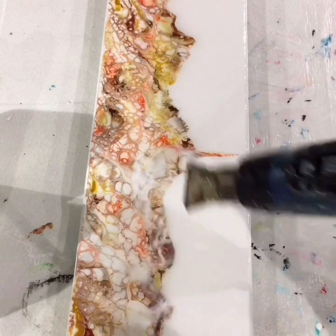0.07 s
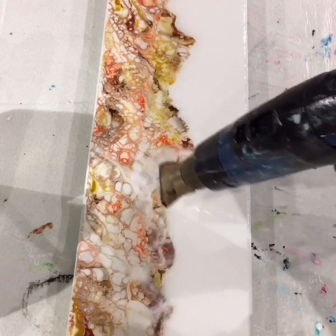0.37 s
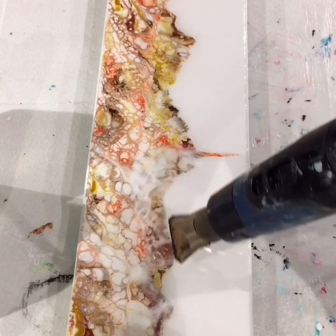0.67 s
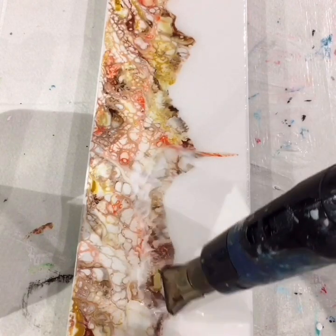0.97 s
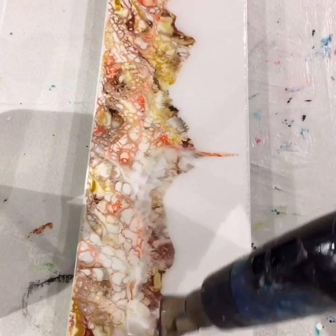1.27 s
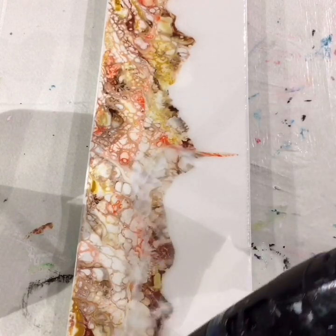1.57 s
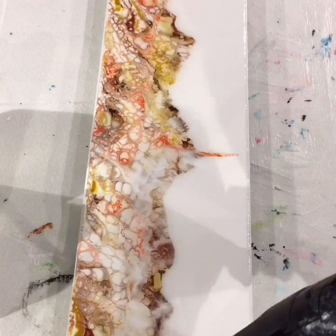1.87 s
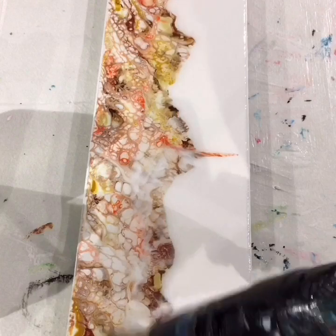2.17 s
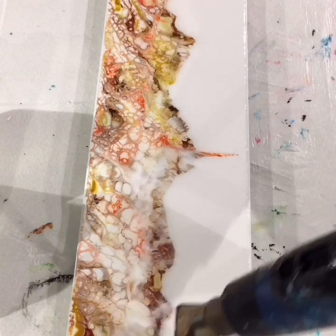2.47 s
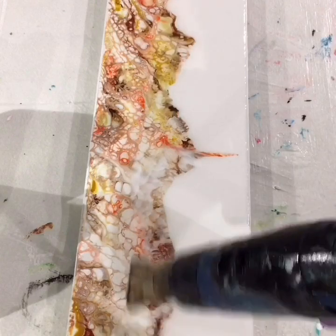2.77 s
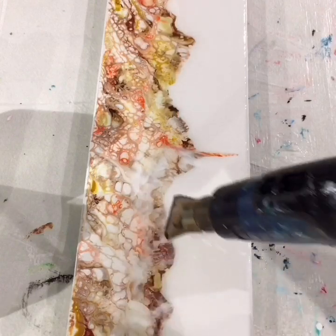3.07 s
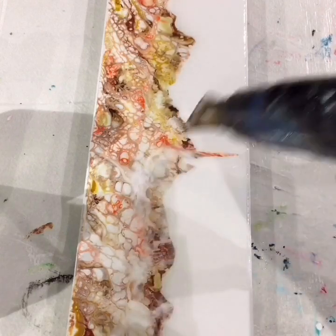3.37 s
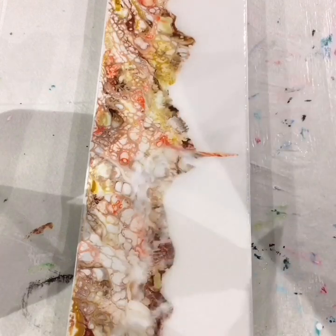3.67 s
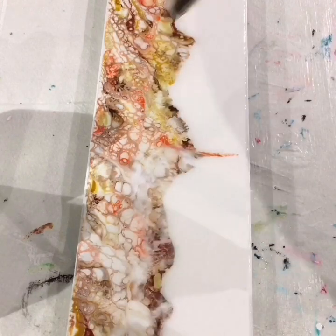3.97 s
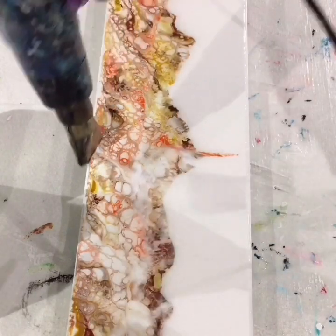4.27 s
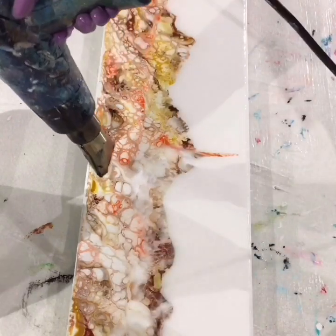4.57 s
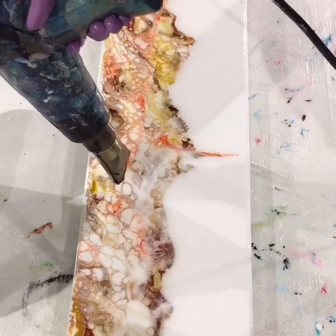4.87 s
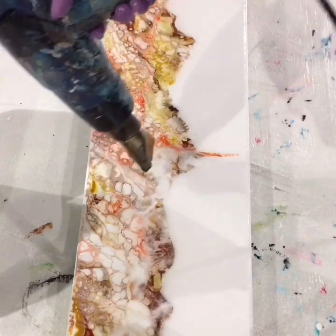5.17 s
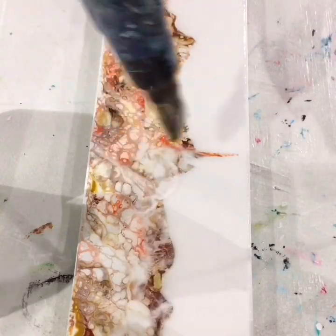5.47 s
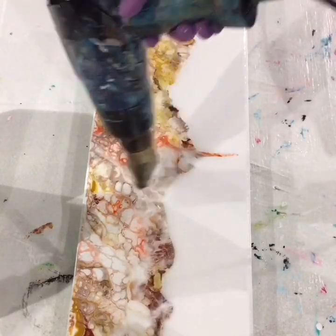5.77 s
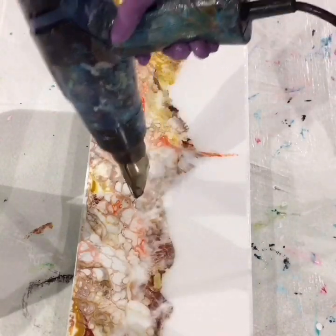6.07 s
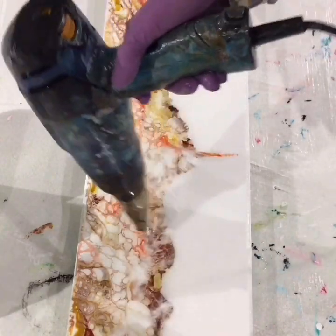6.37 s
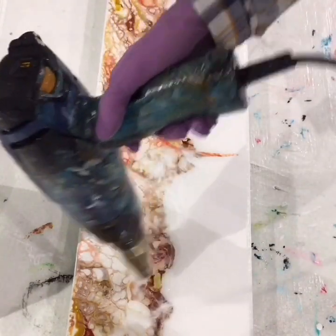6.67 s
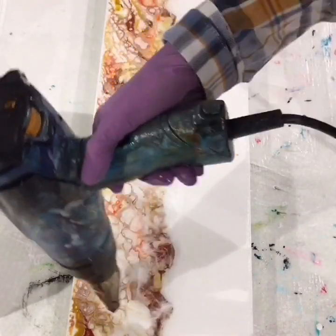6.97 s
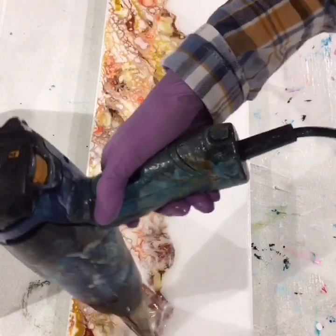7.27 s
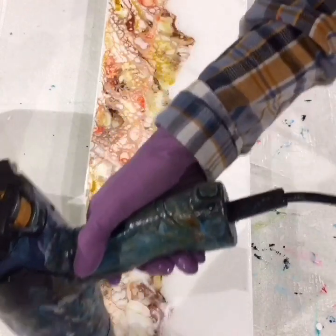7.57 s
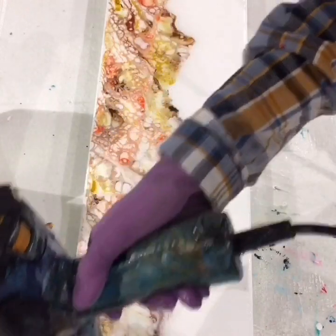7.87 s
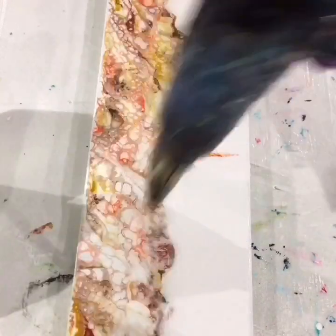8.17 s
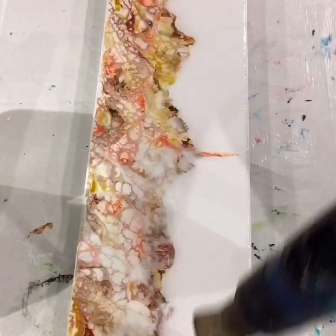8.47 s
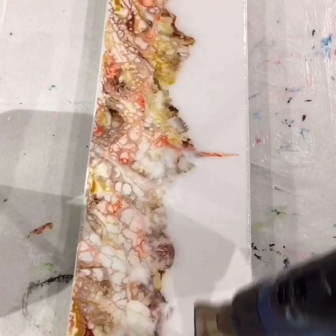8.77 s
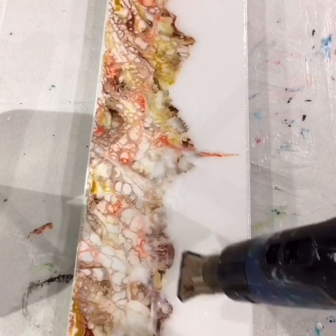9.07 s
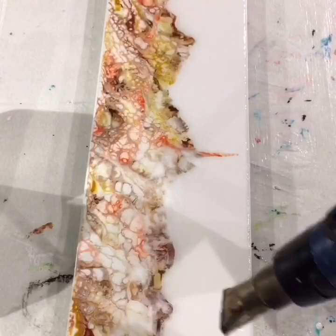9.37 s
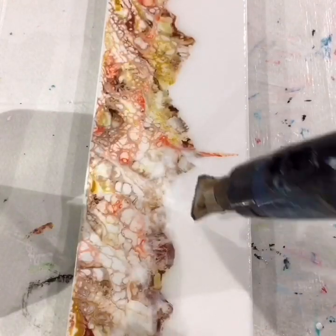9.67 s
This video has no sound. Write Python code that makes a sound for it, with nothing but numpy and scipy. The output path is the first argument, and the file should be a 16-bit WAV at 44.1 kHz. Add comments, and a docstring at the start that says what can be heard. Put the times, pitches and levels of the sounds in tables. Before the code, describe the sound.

A heat gun runs on high the whole time, close to the microphone, sweeping over wet resin on a table. Air roars and hisses through the nozzle over a steady motor hum, whine and fine buzz. Soft swooshes mark its swings. About a third of the way in, it rustles briefly and its plastic housing ticks. Near the end come quick swings and a few sharper ticks, and it keeps blowing.

```python
"""A heat gun on high, swept to and fro over wet resin on a table, close to the microphone.
From the start air roars through barrel and nozzle, mirrored by the table top, while the fan motor hums,
whines and buzzes at about 279 turns a second. Swings swoosh, and from about 1 s stray air now and then
brushes the microphone. Near 3.7 s the gun is turned round: it rustles and its housing ticks. A run of
quick swings comes around 8 s, with more ticks near 8.4 s, and the gun blows on to the end."""
import sys
import numpy as np
from scipy import signal
from scipy.fft import rfft, irfft, next_fast_len
from scipy.io import wavfile
from scipy.ndimage import uniform_filter1d, map_coordinates

SR = 44100
rng = np.random.default_rng(int(sys.argv[2]) if len(sys.argv) > 2 else 0)


def dump(signal):
    """Clip the signal to [-1, 1] and save it as 16-bit WAV at the path in sys.argv[1]."""
    limited = np.clip(np.atleast_2d(signal).T, -1, 1)
    pcm = np.round(limited * 32767).astype(np.int16)
    wavfile.write(sys.argv[1], SR, pcm)


N = 432180

# Spectra of the moving air and the handling: pitch_hz, relative_db
RUMBLE_COLOUR = [(20, -32), (32, -23), (42, -9), (50, -5), (59, 3.5), (68, -10), (77, 0.5), (92, -11),
                 (130, -3.5), (185, 0), (380, -2.5), (520, -2), (700, -12.5), (1500, -63)]
WASH_COLOUR = [(300, -15.5), (420, -9.5), (530, -10), (620, 0), (715, 2), (775, -5), (900, -33)]  # air washing over the resin
LOW_ROAR_COLOUR = [(650, -12), (770, -5.5), (850, 1.5), (945, 4.5), (1005, -0.5), (1100, 7), (1180, 3.5),
                   (1260, 3), (1400, -29)]  # barrel
HIGH_ROAR_COLOUR = [(1130, -22), (1280, 2), (1370, 7), (1450, 5.5), (1560, 2.5), (1650, 4.5), (1740, -2),
                    (2100, -2.5)]
RUSH_COLOUR = [(1800, -6), (2700, -1.5), (3100, -2), (3350, 0), (3650, 0), (4000, -6.5), (4500, -29.5),
               (6000, -43)]  # nozzle
SPLASH_COLOUR = [(3000, 6), (3900, 1), (4300, 7), (4900, 0), (5350, -8), (5800, -9), (7500, -40)]  # jet striking the table
JET_HISS_COLOUR = [(4500, -28), (5300, 0.5), (5750, -1.5), (6150, 1.5), (6550, 0), (7050, 1.5), (7600, -3),
                   (8500, -0.5), (10400, -6.5), (11100, -2.5), (12000, -17.5), (13200, -9), (15700, -20)]
VENT_HISS_COLOUR = [(8000, -5), (10500, -4.5), (11200, 1), (13300, 3.5), (15700, 3)]
RUSTLE_COLOUR = [(60, -14), (200, 1), (500, 9), (2000, 13), (4000, 10), (7000, 5), (12000, 6), (16000, 5)]
GUST_COLOUR = [(32, -18), (42, 0), (60, -2), (85, 7), (160, -12)]

# Air layers at the microphone, before their trims: time_s, level_db
RUMBLE_LEVEL = [(0, -52), (1.7, -50.5), (3.3, -53), (4.3, -52.5), (5.3, -51), (7.2, -49), (8.6, -53.5),
                (9.8, -51.5)]
WASH_LEVEL = [(0.0, -48), (1.28, -49.5), (1.58, -46), (5.64, -51), (6.42, -50.5), (8.1, -51.5), (8.36, -43),
              (9.8, -48)]
LOW_ROAR_LEVEL = [(0.0, -38.5), (1.38, -38.5), (1.48, -40), (2.94, -40.5), (3.22, -37), (3.62, -42.5),
                  (4.0, -39.2), (4.08, -42), (5.66, -39.2), (7.18, -39), (7.76, -40.5), (7.92, -38),
                  (8.78, -40), (9.02, -35.5), (9.44, -41.4), (9.8, -37)]
HIGH_ROAR_LEVEL = [(0.0, -38), (0.26, -42.0), (0.6, -37.5), (1.44, -36.5), (1.92, -40.5), (3.78, -38),
                   (4.3, -43.5), (5.14, -37.5), (5.6, -43.2), (5.8, -38.5), (7.44, -36.1), (8.22, -40.2),
                   (8.38, -35.6), (8.62, -40.5), (8.76, -36.5), (9.14, -35), (9.32, -41.5), (9.8, -39.5)]
RUSH_LEVEL = [(0.0, -43.5), (0.14, -38.5), (0.36, -41.5), (1.6, -40), (3.12, -41.5), (3.92, -46),
              (4.06, -42.5), (4.5, -46), (4.96, -37), (5.2, -41.5), (7.62, -41), (8.0, -42.8), (8.08, -40),
              (9.18, -41.5), (9.52, -40.5), (9.8, -42)]
SPLASH_LEVEL = [(0.0, -49), (0.84, -56), (0.92, -48.5), (2.5, -46.9), (3.88, -54.5), (4.36, -50),
                (4.64, -60.3), (4.76, -54.4), (5.24, -58), (5.62, -50), (6.0, -56.5), (7.32, -48.8),
                (8.58, -49), (9.8, -51)]
JET_HISS_LEVEL = [(0.0, -46.0), (2.4, -46.5), (3.8, -46.5), (4.2, -45.5), (4.4, -48.5), (4.6, -45.5),
                  (5.0, -47), (5.4, -44.5), (5.6, -46), (6.6, -44.7), (8.0, -46.5), (8.2, -44), (9.0, -47),
                  (9.8, -44)]
INTAKE_LEVEL = [(0.0, -43.3), (0.92, -37.5), (2.04, -38), (2.32, -31), (2.4, -43.5), (2.74, -34.5),
                (3.4, -41.5), (4.22, -37.5), (4.48, -41.5), (4.64, -38.5), (5.38, -37.6), (5.54, -43),
                (5.8, -34), (6.54, -38), (7.18, -35), (9.5, -40.5), (9.62, -48), (9.8, -41)]
# Fan intake resonances: pitch_hz, width_hz, relative_db
INTAKE_MODES = [(2268, 158, 7.5), (2420, 294, 6.5), (2640, 170, 2.5)]
# Swooshes as the gun swings: start_s, length_s, from_hz, to_hz, half_width_hz, peak_db
SWINGS = [(.35, 0.97, 3900, 3900, 250, -44.5), (1.501, .85, 4910, 5400, 500, -52),
          (2.24, .28, 2460, 1913, 260, -39.5), (2.744, 0.28, 2350, 1893, 260, -38),
          (2.95, 0.12, 2700, 2550, 180, -41), (4.02, 0.15, 2900, 2650, 170, -39.5),
          (4.097, .16, 2217, 1990, 300, -36), (4.219, 0.16, 2385, 2830, 300, -39),
          (5.537, 0.16, 2980, 4280, 450, -56), (7.05, 0.636, 2330, 2378, 149, -33),
          (7.901, 0.22, 2500, 2710, 300, -45), (8.079, 0.119, 2500, 2320, 190, -32.5),
          (8.138, .11, 3000, 2710, 280, -35.5), (8.259, .14, 2450, 2595, 160, -36.5),
          (8.481, 0.23, 2515, 2730, 230, -35), (9.35, 0.37, 2920, 3750, 300, -42)]
# Lag of the table top's reflection, set by the gun's height: time_s, lag_ms
TABLE_LAG = [(0.0, 1.14), (0.75, 0.8), (1.16, 0.78), (2.86, 0.94), (3.08, 1.08), (3.74, 0.5), (3.87, 0.42),
             (4.0, 1.1), (4.54, 0.88), (4.63, 0.82), (5.06, 0.8), (5.55, 0.62), (6.05, 0.82), (7.1, 0.86),
             (7.18, 0.52), (8.28, 0.4), (9.56, 1.12), (9.8, 0.96)]

# Motor speed, sagging a little in quick swings: time_s, shaft_hz
SHAFT_SPEED = [(0.0, 279.1), (0.12, 278.7), (1.28, 279.2), (1.48, 278.3), (2.34, 279.3), (2.46, 278.7),
               (3.68, 279.2), (4.22, 277.0), (4.98, 279.3), (5.36, 279.7), (7.82, 279.7), (8.52, 277.8),
               (8.84, 278.8), (9.42, 279.6), (9.54, 277.4), (9.62, 279.1), (9.7, 278.3), (9.8, 278.9)]
# Motor sounds that depend on how the gun points: time_s, level_db
HUM_LEVEL = [(0.0, -54), (0.94, -51.5), (2.24, -58.5), (3.76, -49.5), (3.84, -56.1), (4.0, -44.5),
             (8.26, -49.5), (8.72, -55.0), (8.8, -67), (9.04, -54), (9.8, -53)]  # strongest with the motor facing the microphone
WHISTLE_LEVEL = [(0, -54), (1.3, -76), (1.95, -50.5), (2.4, -70), (5.0, -65), (5.4, -53.5), (6.5, -59),
                 (8.1, -55), (8.7, -57), (9.8, -60)]  # clearest with the back of the gun near
TREBLE_LEVEL = [(0.0, -45.5), (0.52, -43.7), (1.02, -47), (1.28, -42), (2.1, -47), (2.46, -43),
                (2.9, -45.5), (3.26, -42.5), (3.4, -44.5), (4.34, -47.5), (7.44, -41), (7.88, -43.5),
                (8.14, -40.5), (8.6, -45), (9.32, -44), (9.8, -43.5)]  # beams out of the vents; only its rise and fall is used
# Two bright high motor tones that stand out and glint: shaft_multiple, mean_db
SHRILL_TONES = [(40, -58.5), (47, -59)]
# Other clear shaft tones, before their trim: shaft_multiple, level_db
CLEAR_TONES = [(3, -56.5), (4, -58), (6, -59), (7, -68), (9, -56), (12, -62), (16, -66.5), (22, -66),
               (23, -74), (25, -62), (33, -64), (34, -65), (37, -64.5), (39, -67), (50, -60), (53, -67),
               (55, -72)]
# Even comb of commutator buzz between them, before the same trim: pitch_hz, line_db
BUZZ_COLOUR = [(2800, -55.5), (4000, -86), (5500, -62), (8000, -74), (10000, -67), (12000, -62.5),
               (14000, -70), (15700, -64)]

# Scrapes as the gun is turned round: peak_s, peak_db
SCRAPES = [(3.695, -34), (3.735, -33), (3.767, -35), (3.842, -46)]
# Ticks of the plastic housing: start_s, ring_db, pitch_hz, ring_t60_s, crack_relative_db
TICKS = [(3.7004, -23, 3800, 0.0095, -2), (3.7265, -33, 2800, 0.0056, -2), (3.7402, -27, 7000, .004, 8),
         (3.763, -25, 6100, 0.0056, -2), (3.841, -27, 4280, 0.0055, 5), (8.3937, -15.5, 8610, 0.0039, 0),
         (8.406, -26, 6300, .005, 5), (8.473, -10.5, 6150, 0.0035, -5), (8.5922, -24, 5570, 0.0049, 7.5)]
# Stray air at the microphone: peak_s, length_s, peak_db
GUSTS = [(1.2, .3, -68), (1.7, .7, -59), (2.7, 0.59, -63), (3.72, 0.23, -63), (5.4, .2, -70),
         (5.9, 0.27, -63), (8.3, 0.23, -59)]

DRONE_ORDER, WHINE_ORDER, WHISTLE_ORDER = 5, 8, 20  # shaft multiples; the whine is the fan blades'
TOP_HZ = 15700


def airflow(flicker_db=0.61, low_trim_db=-0.02, high_trim_db=-0.17, rush_trim_db=1.47,
            splash_trim_db=2.1, hiss_trim_db=0.77):
    """Turbulence in intake, barrel and nozzle, and where the jet meets the table."""
    rumble = tint(noise(), RUMBLE_COLOUR) * undb(curve(RUMBLE_LEVEL))
    wash = tint(noise(), WASH_COLOUR) * undb(curve(WASH_LEVEL))
    roar = tint(noise(), LOW_ROAR_COLOUR) * undb(curve(LOW_ROAR_LEVEL) + low_trim_db)
    roar += tint(noise(), HIGH_ROAR_COLOUR) * undb(curve(HIGH_ROAR_LEVEL) + high_trim_db)
    roar = shimmer(roar, depth_db=1.65, rate_hz=6.7, patch_hz=118) * undb(flicker_db * walk(18))
    rush = shimmer(tint(noise(), RUSH_COLOUR), depth_db=2.0, rate_hz=5.5, patch_hz=232)
    rush *= undb(curve(RUSH_LEVEL) + rush_trim_db + flicker_db * walk(20))
    splash = tint(noise(), SPLASH_COLOUR) * undb(curve(SPLASH_LEVEL) + splash_trim_db)
    hiss = shimmer(tint(noise(), JET_HISS_COLOUR), depth_db=1.9, rate_hz=7.0, patch_hz=495)
    hiss *= undb(curve(JET_HISS_LEVEL) + hiss_trim_db + walk(14))
    return rumble + wash + roar + swings(intake()) + rush + splash + hiss


def intake(waver_db=0.7, trim_db=0.1):
    """Intake resonances trade strength as the gun tilts: with the hum, the top gains, the lowest loses."""
    tilt_db = 0.14 * swell(HUM_LEVEL)
    ring = np.zeros(N)
    for lean, (hz, width_hz, db) in zip(np.linspace(-1, 1, len(INTAKE_MODES)), INTAKE_MODES):
        ring += undb(db + lean * tilt_db + waver_db * walk(3.95)) * resonate(noise(), hz, width_hz)
    return unit(ring) * undb(curve(INTAKE_LEVEL) + trim_db)


def swings(ring, duck_share=0.81, reach_hz=800):
    """Each swing adds a swoosh; the intake ring gives up power to it when they are near in pitch."""
    ring, swoosh = ring.copy(), np.zeros(N)
    ring_hz = np.mean(INTAKE_MODES, axis=0)[0]
    for start_s, length_s, from_hz, to_hz, half_width_hz, peak_db in SWINGS:
        progress = np.linspace(0, 1, int(length_s * SR))
        span = slice(int(start_s * SR), int(start_s * SR) + len(progress))
        arch = np.sin(np.pi * progress)
        hz = from_hz + (to_hz - from_hz) * progress
        nearness = np.exp(-((hz - ring_hz) / reach_hz) ** 2)
        ring[span] *= np.sqrt(1 - duck_share * arch * nearness)
        swoosh[span] += undb(peak_db) * arch * glide(hz, half_width_hz)
    return ring + swoosh


def motor(flutter=0.00022, waver_db=1.05, glint_db=3.0, glint_hz=9.8, fade_hz=3.0, trim_db=2.3):
    """Shaft harmonics; all but the leading ones fade and turn in phase as the gun moves."""
    shaft_hz = curve(SHAFT_SPEED)
    phase = 2 * np.pi * np.cumsum(shaft_hz * (1 + flutter * walk(30))) / SR
    hum_swell_db = swell(HUM_LEVEL)
    beam_db = 0.95 * swell(TREBLE_LEVEL)
    leading_db = {1: curve(HUM_LEVEL) + waver_db * walk(7),
                  2: -61.5 + 0.67 * hum_swell_db,
                  DRONE_ORDER: -47 + 0.72 * swell(HIGH_ROAR_LEVEL) + 0.35 * hum_swell_db,
                  WHINE_ORDER: -45 + 1.46 * swell(INTAKE_LEVEL),
                  WHISTLE_ORDER: curve(WHISTLE_LEVEL) + waver_db * walk(7)}
    for order, db in SHRILL_TONES:  # short wavelengths glint with every tremor of the hand
        leading_db[order] = db + beam_db + glint_db * walk(glint_hz)
    clear_db, beam = dict(CLEAR_TONES), undb(beam_db)
    tones = np.zeros(N)
    for order in range(1, int(TOP_HZ / shaft_hz.mean()) + 1):
        angle = order * phase + 2 * np.pi * rng.random()
        if order in leading_db:
            tones += undb(leading_db[order]) * np.sin(angle)
            continue
        line_hz = order * shaft_hz.mean()
        line_db = clear_db.get(order, colour_at(BUZZ_COLOUR, line_hz)) + trim_db
        direct = np.sin(angle)
        reflected = walk(fade_hz) * direct + walk(fade_hz) * np.cos(angle)
        line = (direct + reflected) * undb(line_db) / np.sqrt(3)
        tones += line * beam if line_hz > 8000 else line
    return np.sqrt(2) * tones


def vents(mean_db=-51.5, flicker_db=0.7):
    """Fine hiss leaves the motor vents with the buzz, rising as they turn to the microphone."""
    level_db = mean_db + 1.2 * swell(TREBLE_LEVEL) + flicker_db * walk(9.2)
    hiss = shimmer(tint(noise(), VENT_HISS_COLOUR), depth_db=5.5, rate_hz=3.8, patch_hz=391)
    return hiss * undb(level_db)


def table_top(air, reflection_gain=0.1):
    """The reflection combs the air noise, and the comb slides with the gun's height."""
    dulled = uniform_filter1d(air, size=4)  # the uneven resin scatters the treble
    delayed_index = np.arange(N) - curve(TABLE_LAG) * SR / 1000
    return air + reflection_gain * map_coordinates(dulled, [delayed_index], order=3)


def housing_ticks(crack_t60_s=0.016):
    """Each tick of the plastic is a short bright crack and one quickly damped ring."""
    ticks, t = np.zeros(N), np.arange(SR // 20) / SR
    highpass = signal.butter(2, 4000, "high", fs=SR)
    for start_s, ring_db, pitch_hz, ring_t60_s, crack_db in TICKS:
        ring = np.sin(2 * np.pi * pitch_hz * t) * undb(-60 * t / ring_t60_s)
        crack = signal.lfilter(*highpass, rng.standard_normal(len(t))) * undb(-60 * t / crack_t60_s)
        start = int(start_s * SR)
        ticks[start:start + len(t)] += undb(ring_db) * (ring + undb(crack_db) * crack / 2)
    return ticks


def rustle(attack_s=0.029, release_s=0.035, grain_db=3.5, grains_per_s=600):
    """Dense uneven scrapes while the gun is turned round; each swells and dies away."""
    t, power = np.arange(N) / SR, np.zeros(N)
    for peak_s, peak_db in SCRAPES:
        falloff = np.maximum((peak_s - t) / attack_s, (t - peak_s) / release_s).clip(0, 20)
        power += (undb(peak_db) * np.exp(-falloff)) ** 2
    grain_index = (np.arange(N) * grains_per_s / SR).astype(int)
    grain_gain = undb(grain_db * np.sqrt(3) * rng.uniform(-1, 1, N))
    return tint(noise() * grain_gain[grain_index], RUSTLE_COLOUR) * np.sqrt(power)


def gusts():
    """Soft low buffets as stray air from the jet reaches the microphone."""
    t = np.arange(N) / SR
    envelope = sum(undb(db) * np.exp(-(2 * (t - peak_s) / length_s) ** 2)
                   for peak_s, length_s, db in GUSTS)
    return tint(noise(), GUST_COLOUR) * envelope


def shimmer(x, depth_db, rate_hz, patch_hz):
    """Patches of the spectrum rise and sink as the nozzle turns."""
    hz, time_s, frames = signal.stft(x, SR, nperseg=512)
    patches = rng.standard_normal((64, 128))
    grid = np.meshgrid(hz / patch_hz, time_s * rate_hz, indexing="ij")
    gain_db = depth_db * map_coordinates(patches, grid, mode="wrap")
    return signal.istft(frames * undb(gain_db), SR)[1][:N]


def glide(hz, half_width_hz):
    """A band of noise whose centre follows `hz`."""
    real, imaginary = rng.standard_normal((2, 2 * SR))[:, :len(hz)]
    envelope = signal.lfilter(*signal.butter(2, half_width_hz, fs=SR), real + 1j * imaginary)
    carrier = np.exp(2j * np.pi * np.cumsum(hz) / SR)
    return unit(np.real(envelope * carrier))


def resonate(x, hz, width_hz):
    """A resonance, applied twice for steep skirts."""
    b, a = signal.iirpeak(hz, hz / width_hz, fs=SR)
    return signal.lfilter(b, a, signal.lfilter(b, a, x))


def tint(x, colour):
    """Give a sound a spectrum, at rms 1."""
    size = next_fast_len(N, True)
    gain = undb(colour_at(colour, np.fft.rfftfreq(size, 1 / SR)))
    return unit(irfft(rfft(x, size) * gain, size)[:N])


def colour_at(colour, hz):
    """Read a spectrum in dB on a log-frequency axis; it falls 60 dB an octave beyond its ends."""
    points_hz, db = np.transpose(colour)
    octave, known = np.log2(np.maximum(hz, 1)), np.log2(points_hz)
    octaves_outside = np.abs(octave - np.clip(octave, known[0], known[-1]))
    return np.interp(octave, known, db) - 60 * octaves_outside


def walk(rate_hz):
    """Smooth random drift with a spread near 1, changing about `rate_hz` times a second."""
    values = rng.standard_normal(1024)
    position = np.linspace(0, N / SR, 2048) * rate_hz + 10 * rng.random()
    drift = map_coordinates(values, [position], order=3, mode="wrap")
    return np.interp(np.arange(N), np.linspace(0, N, len(drift)), drift)


def curve(table):
    """Rows of (time_s, value), joined by straight lines."""
    return np.interp(np.arange(N) / SR, *np.transpose(table))


def swell(table):
    """How far a level stands above its own mean, in dB."""
    db = curve(table)
    return db - db.mean()


def noise():
    """White noise."""
    return rng.standard_normal(N)


def unit(x):
    """Scale to rms 1."""
    return x / np.sqrt(np.mean(x ** 2))


def undb(db):
    """Decibels to gain."""
    return 10 ** (np.asarray(db) / 20)


def scene():
    """One close microphone at the table, alike in both channels."""
    mono = motor() + vents() + table_top(airflow()) + gusts() + rustle() + housing_ticks()
    return np.array([mono, mono])


def record(dry):
    """The recorder cuts steeply above TOP_HZ."""
    return signal.sosfilt(signal.ellip(12, 0.1, 90, TOP_HZ, fs=SR, output="sos"), dry)


dry = scene()
out = record(dry)
dump(out)
```